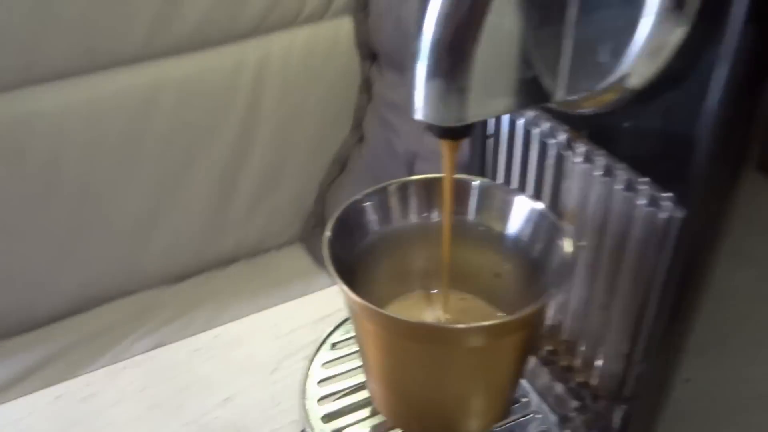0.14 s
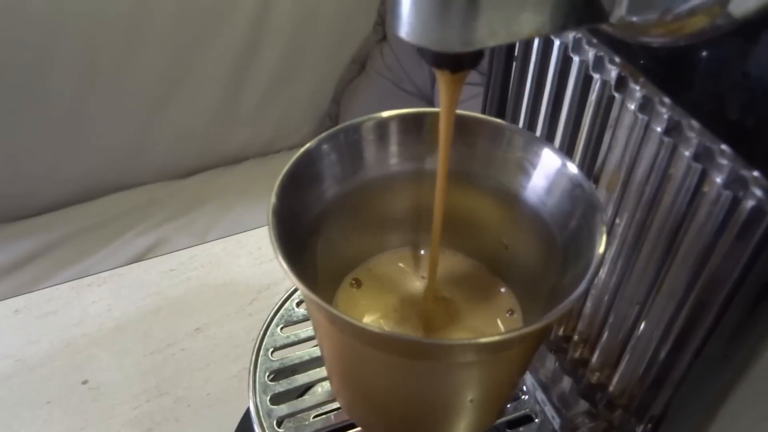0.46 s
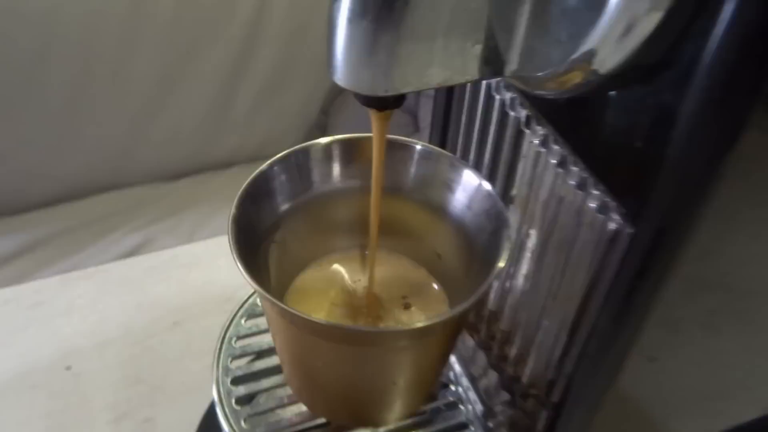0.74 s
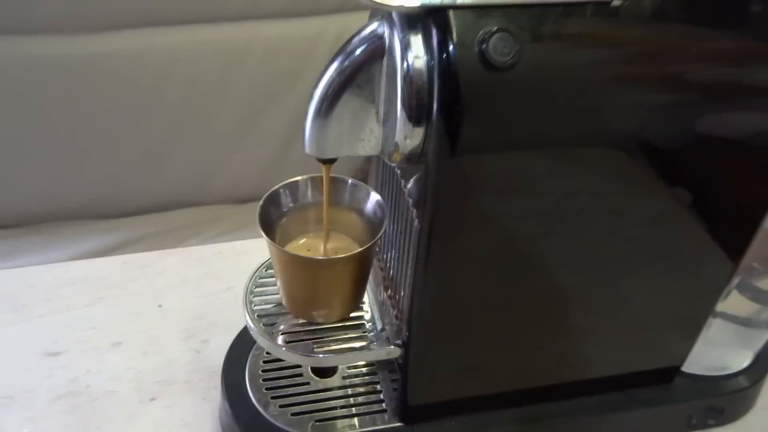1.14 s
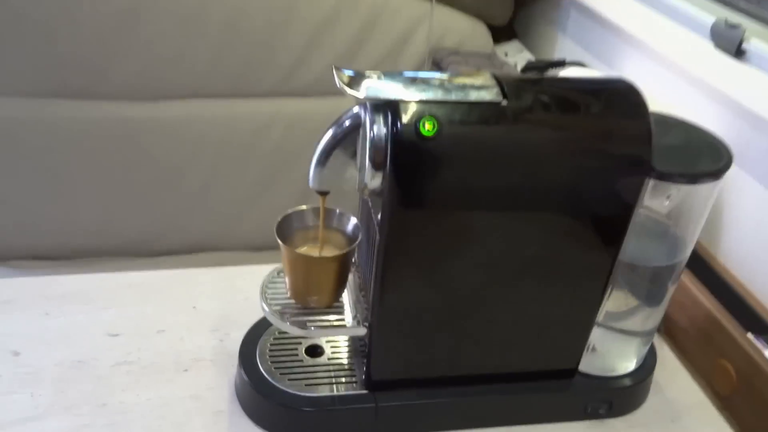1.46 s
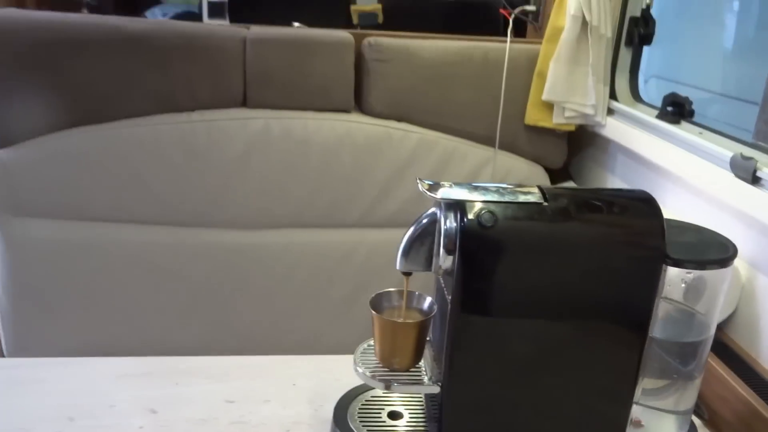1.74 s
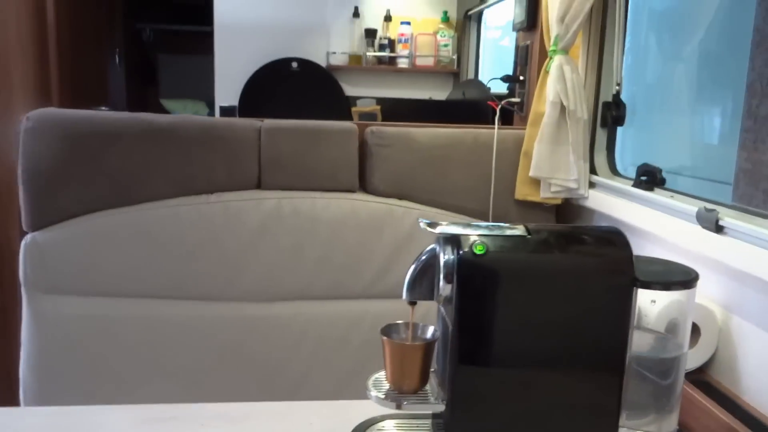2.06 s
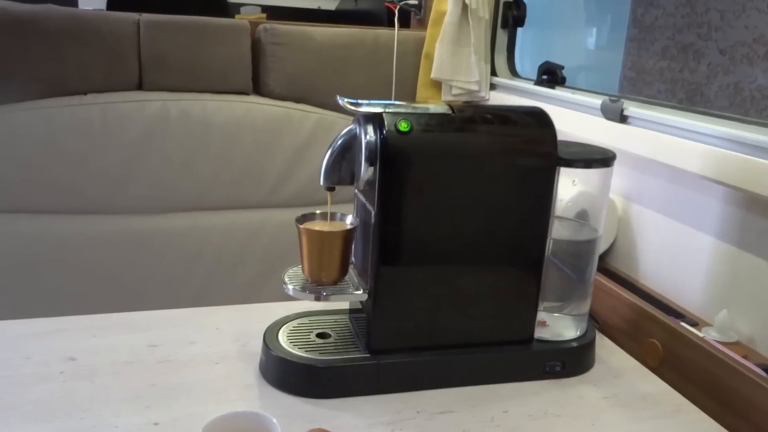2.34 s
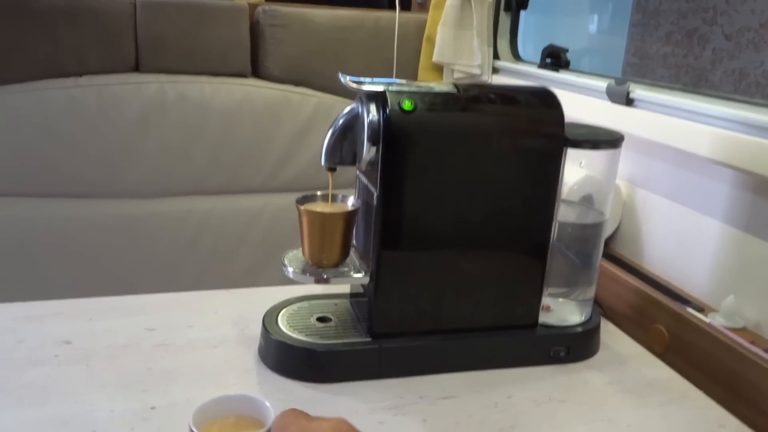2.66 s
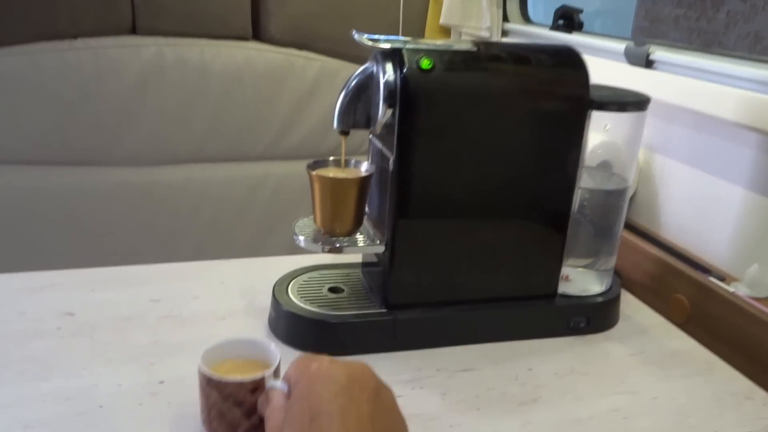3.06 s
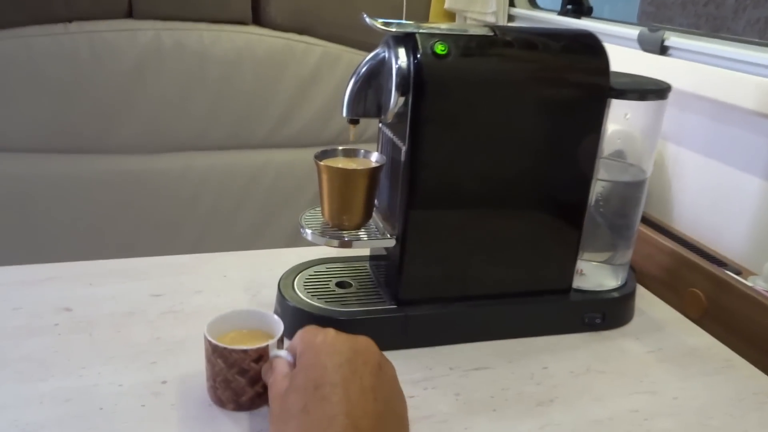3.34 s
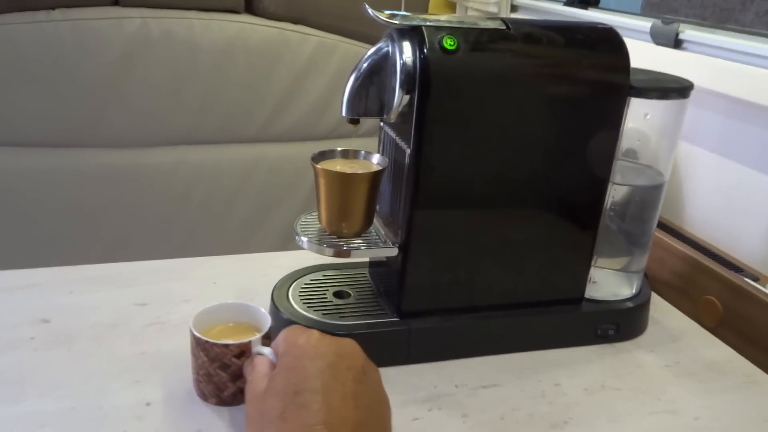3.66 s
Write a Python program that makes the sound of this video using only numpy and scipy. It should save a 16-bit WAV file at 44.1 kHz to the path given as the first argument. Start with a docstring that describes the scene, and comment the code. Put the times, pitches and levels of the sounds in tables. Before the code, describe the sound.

A capsule coffee machine's pump buzzes harshly, about fifty strokes a second, with rattling housing, ringing panels and bright valve spitting. A faint whine fades within 0.2 seconds; the tone shifts near 0.5. Coffee gurgles and pops throughout. At 2.4 seconds everything cuts dead, leaving faint air. From about 2.75 a china cup scrapes and judders, the table droning, bumping softly around 3.6-3.7. Close stereo, small padded van.

```python
"""A pump thumps and rattles about fifty times a second while coffee gurgles, until all this is cut off;
then a china cup is pushed across a table top, which drones under it, in a small, padded camper van.
The capsule espresso machine is a sum of pump harmonics and of noise bursts, one per stroke, through
resonances; the coffee is swells of filtered grains and sharp pops. The cup is juddering friction noise
that excites the modes of the table and the china. Still air lies beneath."""
import sys
import numpy as np
from scipy.fft import rfft, irfft, next_fast_len
from scipy.io import wavfile

SR = 44100
rng = np.random.default_rng(int(sys.argv[2]) if len(sys.argv) > 2 else 0)


def materialize(psi):
    """Save the field psi as 16-bit PCM at rate SR to the path in sys.argv[1].

    A 1-D psi becomes a single channel; in a 2-D psi each row is a channel.
    """
    bounded = np.clip(np.atleast_2d(psi).T, -1, 1)
    quanta = np.round(bounded * 32767).astype(np.int16)
    wavfile.write(sys.argv[1], SR, quanta)


N = 167580
TIME = np.arange(N) / SR
FFT_SIZE = next_fast_len(N + SR // 2)
FREQS = np.maximum(np.arange(FFT_SIZE // 2 + 1) * SR / FFT_SIZE, 1)

PUMP_HZ, CUT_OFF_S = 50.05, 2.38
TONE_CHANGE_S, TONE_CHANGE_TAKES_S = .525, .014

THUMP_AT_S, HUM_SCATTER_RAD, HUM_WAVER_DB = .016, 1.73, 0.4
SLIP_S, SLIP_TAKES_S = 0.0018, 0.029
# Harmonics of the piston's thump before the tone change. Each entry: relative level in dB,
# for 1, 2, 3.. times the pump rate.
HUM_EARLY_LEVELS = [-77, -63, -63.5, -57.5, -59.5, -54, -44, -36.5, -45.5, -59, -43, -49.5, -55, -56, -63]
# The same harmonics after the tone change. Each entry: relative level in dB.
HUM_LATE_LEVELS = [-72.5, -64.5, -58.5, -57.5, -59, -53, -45, -44, -43.5, -49.5, -53, -43.5, -66.5, -45.5,
                   -50]


def hum():
    """Fourier synthesis: wavering harmonics of the thump, bent up briefly as the piston slips ahead."""
    slip = SLIP_S * (.5 - .5 * np.tanh((TIME - TONE_CHANGE_S) / SLIP_TAKES_S))
    clock = TIME - THUMP_AT_S - slip
    out = 0
    for multiple, (early_db, late_db) in enumerate(zip(HUM_EARLY_LEVELS, HUM_LATE_LEVELS), 1):
        # each harmonic gets a random phase offset, which spreads the thump
        scatter = HUM_SCATTER_RAD * (2 * rng.random() - 1)
        phase = 2 * np.pi * multiple * PUMP_HZ * clock + scatter
        level_db = tone_change(early_db, late_db) + HUM_WAVER_DB * drift(16)
        out = out + from_db(level_db) * np.sqrt(2) * np.cos(phase)
    return out


RATTLE_DB, RATTLE_AT_S, RATTLE_RISE_S = -25.5, .0192, 0.0017
RATTLE_DECAY_S, RATTLE_REST = .009, .45
RATTLE_REPEATS_EARLY, RATTLE_REPEATS_LATE = 0.57, 0.2
PANEL_DB, PANEL_DECAY_S, PANEL_REST, PANEL_REPEATS = -26, 0.0054, 0.34, .65
# Spectrum of the housing's rattle. Each row: frequency in Hz, relative level in dB before
# the tone change, relative level in dB after.
HOUSING_SPECTRUM = [(68, -40, -23.5), (216, -12, -19.5), (350, -9, -11.5), (420, 2.5, 5.5), (704, -6.5, -4),
                    (816, 0, -8), (1320, -3.5, -4), (2050, -8, -6.5), (2670, -19, -12.5),
                    (9200, -25.5, -27), (9900, -25.5, -22.5)]
# Panel resonances. Each row: frequency in Hz, width in Hz, relative level in dB before
# the tone change, relative level in dB after.
PANEL_MODES = [(960, 28, 1, -1.5), (1156, 57, 3, 5), (1430, 86, 3.5, 0), (1819, 17.2, 14, 10),
               (1957, 75, -2.5, 4), (2366, 18, -3.5, 2)]


def rattle():
    """Forced vibration: each stroke shakes the housing and raps its panels, so their ring flutters."""
    repeats = tone_change(RATTLE_REPEATS_EARLY, RATTLE_REPEATS_LATE)
    shaking = strokes(RATTLE_AT_S, RATTLE_RISE_S, RATTLE_DECAY_S, RATTLE_REST, repeats)
    raps = strokes(RATTLE_AT_S, RATTLE_RISE_S, PANEL_DECAY_S, PANEL_REST, PANEL_REPEATS)
    body = tone_change(*[through(shaking, gain) for gain in on_freqs(HOUSING_SPECTRUM)])
    panels = tone_change(*[through(raps, modes) for modes in resonances(PANEL_MODES)])
    return from_db(RATTLE_DB) * body + from_db(PANEL_DB) * panels


TICK_AT_S, TICK_S = .0135, 0.00033
SPIT_DB, SPIT_AT_S, SPIT_REPEATS = -33, 0.01531, 0.16
SPIT_RISE_S, SPIT_DECAY_S, SPIT_REST = 0.0041, .0045, .33
# Water spat through the valve. Each row: frequency in Hz, relative level in dB before
# the tone change, relative level in dB after.
SPIT_SPECTRUM = [(1540, -11, -60), (3650, -1, 0), (4270, -5, -5.5), (5320, 1, 2.5), (6200, -2.5, -2),
                 (8100, -19, -25), (8700, -5.5, -28), (9300, -21, -49)]
# Ring of the valve. Each row: frequency in Hz, width in Hz, relative level in dB.
VALVE_MODES = [(4870, 79, -3), (5650, 110, -13), (6080, 71, -3.5), (7280, 95, 7)]
# Tick of the valve. Each row: frequency in Hz, width in Hz, relative level in dB.
TICK_MODES = [(3570, 740, -43.5)]


def valve():
    """Impact and jet noise: the valve ticks shut, and a bright, ringing spit swells on each stroke."""
    tick = through(strokes(TICK_AT_S, TICK_S, TICK_S, 0, 1), *resonances(TICK_MODES))
    jet = strokes(SPIT_AT_S, SPIT_RISE_S, SPIT_DECAY_S, SPIT_REST, SPIT_REPEATS)
    rings, = resonances(VALVE_MODES)
    spit = tone_change(*[through(jet, gain * (1 + rings)) for gain in on_freqs(SPIT_SPECTRUM)])
    return tick + from_db(SPIT_DB) * spit


WHINE_HZ, WHINE_DB, WHINE_ENDS_S = 2408, -43, 0.19


def whine():
    """Pure tone: a thin sine near the pump's 48th harmonic, gone after the first moments."""
    fade = np.exp(-(TIME / WHINE_ENDS_S) ** 4)
    return from_db(WHINE_DB) * fade * np.sqrt(2) * np.sin(2 * np.pi * WHINE_HZ * TIME)


STROKE_SPREAD_DB, GRAIN_DB = 2.6, 1


def strokes(at_s, rise_s, decay_s, rest, repeats):
    """Periodic excitation: a burst of contacts on every pump stroke; a share repeats exactly."""
    count, phase = np.divmod((TIME - at_s) * PUMP_HZ + 2, 1)
    age = phase / PUMP_HZ  # seconds since the stroke
    repeats = np.clip(repeats, 0, 1)
    burst = np.minimum(age / rise_s, 1) * np.exp(-np.maximum(age - rise_s, 0) / decay_s)
    strength = from_db(STROKE_SPREAD_DB * rng.standard_normal(N)[count.astype(int)])
    # one stroke of noise with a flat spectrum and random phases
    pattern = rms_one(irfft(np.exp(2j * np.pi * rng.random(int(SR / PUMP_HZ / 2) + 2))))
    repeated = np.sqrt(repeats) * pattern[(age * SR).astype(int)]
    fresh = np.sqrt(1 - repeats) * grains(GRAIN_DB)
    return rms_one((rest + burst * strength) * (repeated + fresh))


def tone_change(early, late):
    """Cross-fade: the pump's tone shifts quickly after half a second."""
    share = .5 + .5 * np.tanh((TIME - TONE_CHANGE_S) / TONE_CHANGE_TAKES_S)
    return early * (1 - share) + late * share


GURGLE_DB, GURGLE_WIDTH_S, GURGLE_WIDTH_HZ, GURGLE_GRAIN_DB = -37.5, .021, 380, 4.5
# Gurgles of the pouring coffee. Each row: centre in seconds, relative level in dB, pitch in Hz.
COFFEE_GURGLES = [(.05, -2, 1100), (.505, 4.5, 1004), (.575, 1, 1150), (.755, 2.5, 1130), (1.187, 1, 1220),
                  (1.376, 1.5, 1080), (1.78, -1.5, 1180), (1.945, 1.5, 1120), (2.1, -2.5, 1140),
                  (2.285, 0.5, 1180)]
# Air popping at the spout. Each row: start in seconds, peak in dB before the cabin.
AIR_POPS = [(.299, -17), (.852, -26), (1.5485, -23), (1.5524, -16.5), (1.985, -23)]
# Ring of a pop. Each row: frequency in Hz, width in Hz, relative level in dB before squaring.
POP_MODES = [(1400, 70, -4), (1750, 600, 0), (2100, 90, -7), (10300, 900, -12)]


def coffee():
    """Bubble resonance: swells of small bubbles, each at its own pitch; trapped air pops sharply."""
    bubbles = grains(GURGLE_GRAIN_DB)
    out = strike(*np.transpose(AIR_POPS), resonances(POP_MODES)[0] ** 2)
    for s, db, hz in COFFEE_GURGLES:
        swell = np.exp(-.5 * ((TIME - s) / GURGLE_WIDTH_S) ** 2)
        pitch, = resonances([(hz, GURGLE_WIDTH_HZ, 0)])
        gurgle = swell * through(bubbles, pitch ** 2)
        out = out + from_db(GURGLE_DB + db) * swell.std() * rms_one(gurgle)
    return out


SCRAPE_DB, SCRAPE_TREBLE_DB, SCRAPE_GRAIN_DB = 0.4, 1, 1.5
JUDDER_DB, JUDDER_PER_S = 1.1, 27
# Course of the slide. Each row: time in seconds, relative level of the scrape in dB,
# relative level of its treble in dB.
SLIDE_COURSE = [(2.6, -65, -68.5), (2.72, -63.5, -64), (2.778, -48.5, -57), (2.816, -43.5, -46.5),
                (2.865, -53, -57), (2.915, -42.5, -48.5), (3.075, -35.5, -41), (3.2, -38, -41),
                (3.316, -34.5, -41.5), (3.386, -38.5, -42), (3.66, -40, -46), (3.71, -39.5, -45.5),
                (3.8, -44.5, -48)]
# Friction of the foot. Each row: frequency in Hz, relative level in dB.
SCRAPE_SPECTRUM = [(60, -37), (150, -34), (290, -1), (400, 0.5), (900, -2), (1400, -1.5), (1800, -8),
                   (3200, -10), (4200, -23)]
# Treble of the friction. Each row: frequency in Hz, relative level in dB.
TREBLE_SPECTRUM = [(2500, -26), (4200, -8), (5150, -3.5), (6000, 0), (7500, -1), (9400, 0.5)]
# Ring of the china. Each row: frequency in Hz, width in Hz, relative level in dB.
CHINA_MODES = [(5580, 170, 4.5)]
# Modes of the table top, also rung by the bumps. Each row: frequency in Hz, width in Hz,
# relative level in dB.
TABLE_MODES = [(424, 8.3, 11), (466, 19, 14.5), (656.4, 7.9, 9), (947, 6.1, 9), (1506, 12, 4.5),
               (2184, 6.7, 6), (3770, 24, -6.5)]


def cup():
    """Friction-driven modes: the cup's foot judders over the table, ringing the top and the china."""
    scrape_db, treble_db = in_time(SLIDE_COURSE)
    judder = from_db(JUDDER_DB * drift(JUDDER_PER_S))
    friction = through(judder * grains(SCRAPE_GRAIN_DB), *on_freqs(SCRAPE_SPECTRUM))
    drone = through(judder * grains(SCRAPE_GRAIN_DB), *resonances(TABLE_MODES))
    treble_response = on_freqs(TREBLE_SPECTRUM)[0] + resonances(CHINA_MODES)[0]
    hiss = through(np.sqrt(judder) * grains(SCRAPE_GRAIN_DB), treble_response)
    scrape = from_db(SCRAPE_DB + scrape_db) * rms_one(friction + drone)
    return scrape + from_db(SCRAPE_TREBLE_DB + treble_db) * rms_one(hiss)


RUMBLE_DB, RUMBLE_AT_S, RUMBLE_WIDTH_S = -58, 3.64, .09
# Bumps on the table. Each row: start in seconds, peak of the thud in dB and peak of
# the table top's ring in dB, both before the cabin.
TABLE_BUMPS = [(3.57, -33, -48), (3.65, -42, -46), (3.705, -50, -33)]
# Body of the thud. Each row: frequency in Hz, width in Hz, relative level in dB.
THUD_MODES = [(107, 68, 0), (234, 43, -1)]


def bumps():
    """Impulse response: as the cup slows it catches and bumps, and the table rumbles."""
    s, thud_db, ring_db = np.transpose(TABLE_BUMPS)
    thud, = resonances(THUD_MODES)
    swell = np.exp(-.5 * ((TIME - RUMBLE_AT_S) / RUMBLE_WIDTH_S) ** 2)
    rumble = swell * rms_one(through(rng.standard_normal(N), thud))
    blows = strike(s, thud_db, thud) + strike(s, ring_db, *resonances(TABLE_MODES))
    return blows + from_db(RUMBLE_DB) * rumble


AIR_DB = -46.5
# Still air in the van. Each row: frequency in Hz, relative level in dB.
AIR_SPECTRUM = [(100, -20), (300, -5.5), (850, -1), (3000, -14.5), (11000, -21.5)]


def air():
    """Stationary noise: the steady, coloured hush of the still air."""
    return from_db(AIR_DB) * through(rng.standard_normal(N), *on_freqs(AIR_SPECTRUM))


ROOM_DECAY_S = 0.037
# Reflections from the cabin. Each row: frequency in Hz, relative level in dB.
WALL_SPECTRUM = [(150, -18.5), (400, -28.5), (1100, -20), (10000, -8.5)]


def van(x, balance, lead=0):
    """Level and phase between the channels set the stereo image; brief cabin reflections widen it."""
    echoes = rfft(rng.standard_normal(N) * np.exp(-TIME / ROOM_DECAY_S), FFT_SIZE)
    side = rms_one(np.abs(echoes)) * np.exp(1j * np.angle(echoes)) * on_freqs(WALL_SPECTRUM)[0]
    left = np.sqrt(balance) * np.exp(.5j * lead)
    return through(x, np.array([left + side, 1 / left - side]))


def strike(times, peak_db, response):
    """Impulse excitation: single blows on a body, each ringing up to its peak level."""
    blows = np.zeros(N)
    blows[(times * SR).astype(int)] = from_db(peak_db)
    return through(blows, response) / np.abs(irfft(response)).max()


def grains(spread_db):
    """Granular noise: dense tiny contacts of uneven size."""
    return rms_one(rng.standard_normal(N) * from_db(spread_db * drift(790)))


def drift(rate):
    """Low-passed noise: chance wandering up to about this rate in Hz, with a spread of one."""
    return rms_one(through(rng.standard_normal(N), 1 / (1 + (FREQS / rate) ** 2)))


def resonances(rows):
    """Modal superposition: parallel resonances, one response for each level column."""
    hz, width, *columns = np.transpose(rows)
    peaks = np.array([1 / (1 + 1j * (FREQS ** 2 - f * f) / (FREQS * w)) for f, w in zip(hz, width)])
    return [(from_db(c)[:, None] * peaks).sum(0) for c in columns]


def through(x, response):
    """Linear filtering: multiply the spectrum of a sound by a response."""
    return irfft(rfft(x, FFT_SIZE) * response, FFT_SIZE)[..., :N]


def on_freqs(rows):
    """Spectral envelope: each column as a gain per frequency, in dB over log frequency."""
    hz, *columns = np.transpose(rows)
    return [from_db(np.interp(np.log(FREQS), np.log(hz), c)) for c in columns]


def in_time(rows):
    """Temporal envelope: each column of a curve, sample by sample."""
    s, *columns = np.transpose(rows)
    return [np.interp(TIME, s, c) for c in columns]


def rms_one(x):
    """Effective value: scale to an rms of one."""
    return x / np.sqrt(np.mean(x ** 2) + 1e-20)


def from_db(db):
    """Level law: decibels to amplitude gain."""
    return 10 ** (np.asarray(db) / 20)


# Loudness of the pump. Each row: time in seconds, relative level in dB.
PUMP_EFFORT = [(0, -1.5), (.19, -0.5), (.222, -4.5), (.24, 1.5), (.5, 1.5), (.62, 0.7), (.95, -0.5),
               (1.25, 0.5), (2.38, 0.5)]
# Left minus right before reflections. Each row: frequency in Hz, level difference in dB
# for the machine, level difference in dB for the cup.
STEREO_BALANCE = [(444, 0, -0.9), (1120, -2.5, -1.5), (4430, -2.1, -4.5), (9000, -1, -1.5)]
# Phase lead of the left channel for the cup and the air. Each row: frequency in Hz, lead in radians.
LEFT_LEAD = [(60, 0.4), (400, 0.96), (1000, 1.37), (5000, 0.51), (11000, 0.062)]


def scene():
    """Superposition: the machine until it is cut off, the cup, and the still air."""
    effort_db, = in_time(PUMP_EFFORT)
    machine_side, cup_side = on_freqs(STEREO_BALANCE)
    lead_hz, lead_rad = np.transpose(LEFT_LEAD)
    lead = np.interp(np.log(FREQS), np.log(lead_hz), lead_rad)
    gate = np.clip((CUT_OFF_S - TIME) * 1000, 0, 1)  # cut off within a millisecond
    pump = from_db(effort_db) * (hum() + rattle() + valve() + whine())
    machine = gate * van(pump + coffee(), machine_side)
    return machine + van(cup() + bumps(), cup_side, lead) + van(air(), 1, lead)


CUTOFF_HZ = 11050


def record(dry):
    """Low-pass filtering: the top is cut steeply."""
    return through(dry, 1 / np.sqrt(1 + (FREQS / CUTOFF_HZ) ** 240))


dry = scene()
out = record(dry)
materialize(out)
```